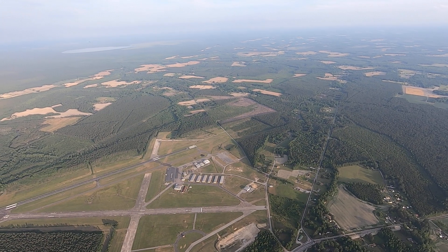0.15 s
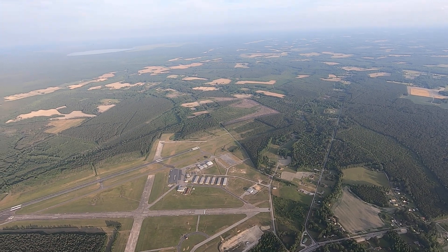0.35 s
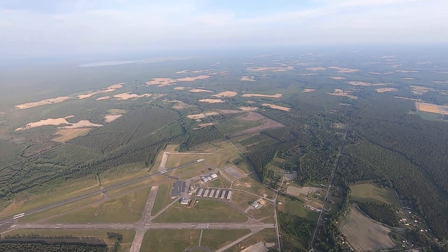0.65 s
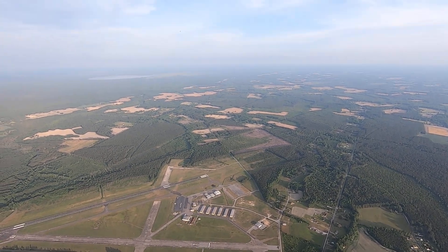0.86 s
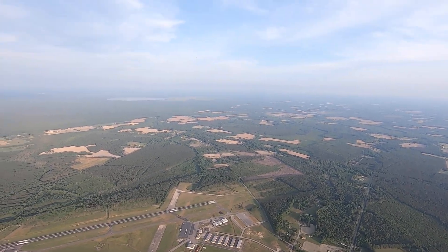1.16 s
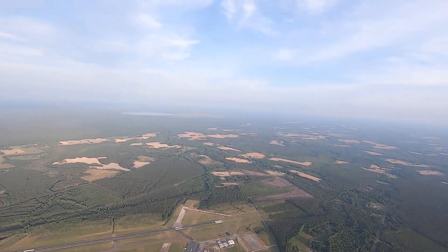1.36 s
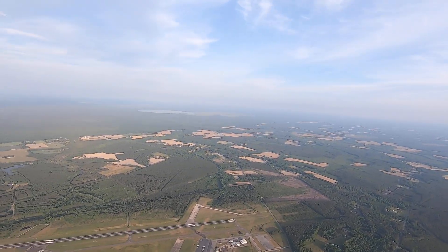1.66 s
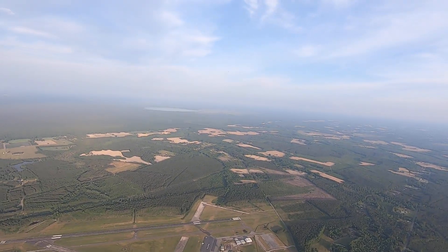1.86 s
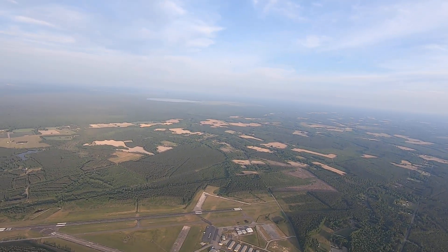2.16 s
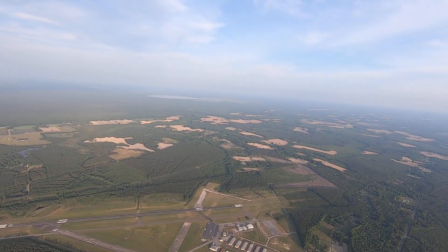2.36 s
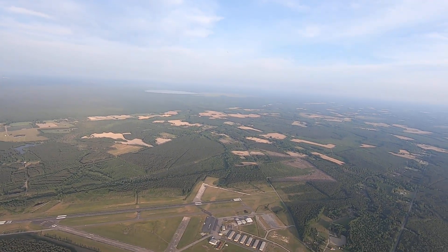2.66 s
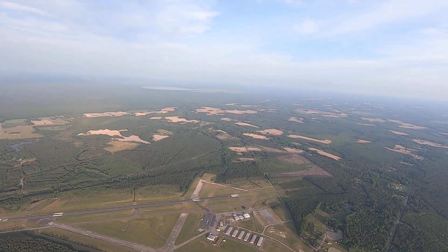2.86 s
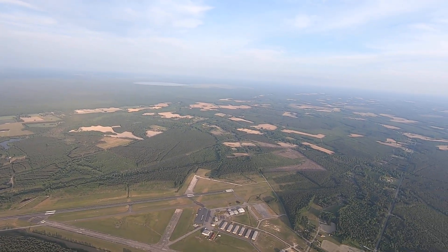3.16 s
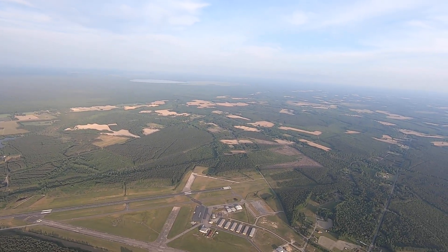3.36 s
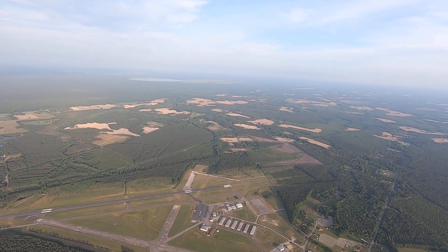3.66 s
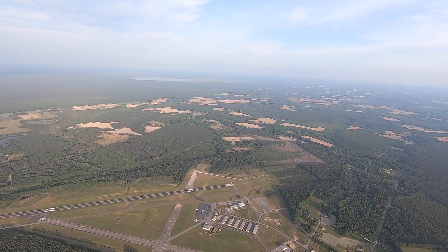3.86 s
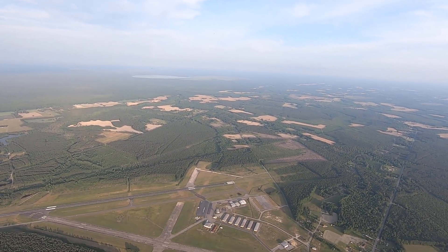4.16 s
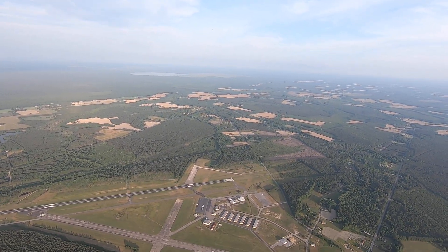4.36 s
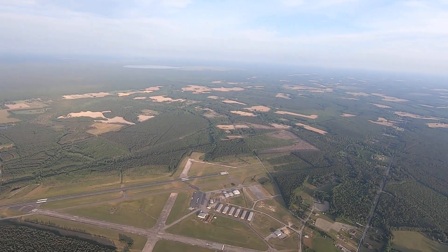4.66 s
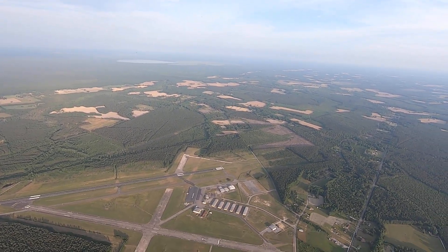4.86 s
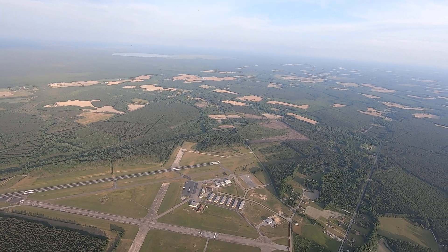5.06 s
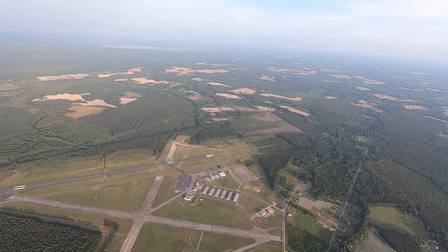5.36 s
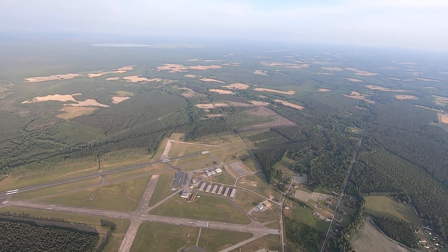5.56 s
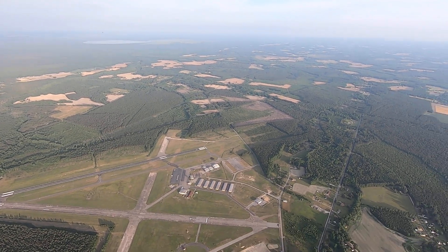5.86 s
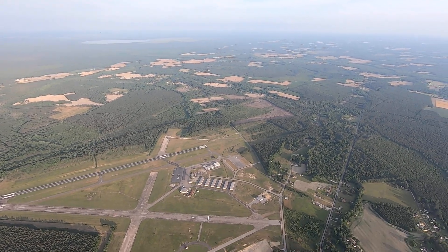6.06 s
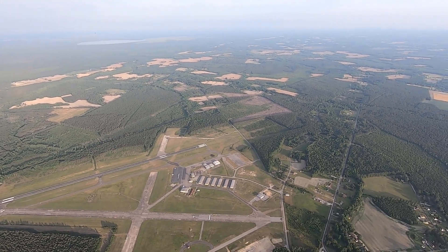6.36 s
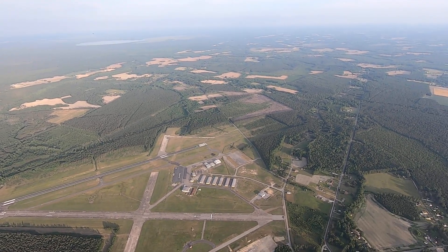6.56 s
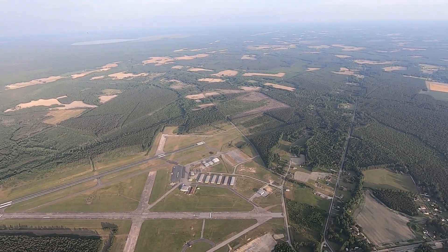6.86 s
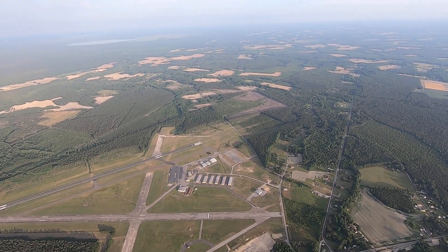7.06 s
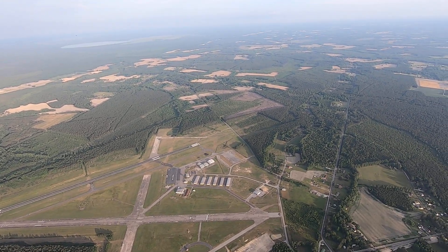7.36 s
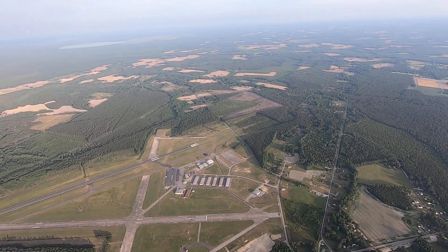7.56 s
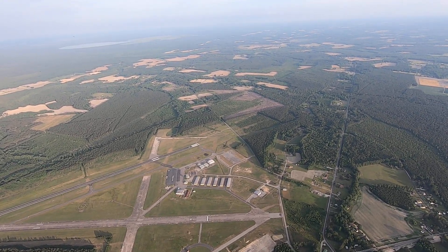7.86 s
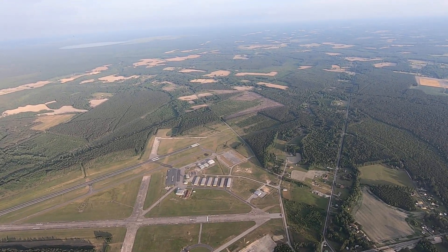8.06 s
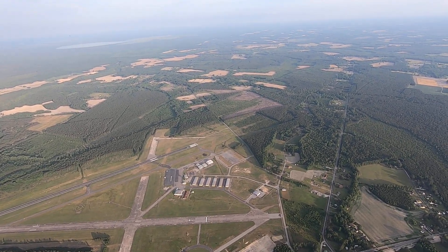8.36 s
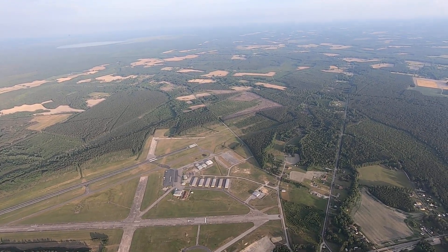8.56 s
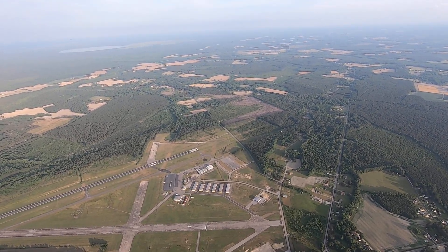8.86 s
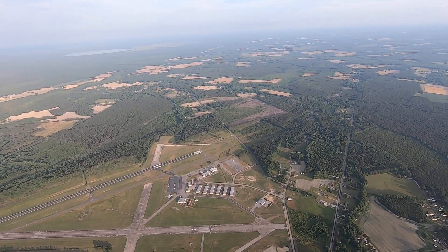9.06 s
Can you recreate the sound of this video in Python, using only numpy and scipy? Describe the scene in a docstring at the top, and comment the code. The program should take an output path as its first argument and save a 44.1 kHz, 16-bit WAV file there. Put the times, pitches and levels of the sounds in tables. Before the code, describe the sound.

A fast airstream batters a microphone high above the ground, low and gusty, with cloth flapping, faint ticks and a rougher, louder finish.

```python
"""Airstream on a camera microphone

A fast airstream tears past a camera microphone high in the open air: seven bands of shaped noise,
one per eddy size from thrum to sizzle, with level curves, shared gusts and brief rises and dips.
Big vortices once lock into a wavering near sine. Loose fabric flaps (filtered snap and noise puff);
something small ticks (gated bright noise). Gain control squeezes and rounds the peaks.
"""
import sys
import numpy as np
from scipy import signal
from scipy.fft import rfft, irfft, next_fast_len
from scipy.io import wavfile
from scipy.ndimage import uniform_filter1d

SR = 44100
rng = np.random.default_rng(int(sys.argv[2]) if len(sys.argv) > 2 else 0)


def put_to_file(sound):
    """Save the sound as 16-bit audio at rate SR, in the file named by the first command-line argument."""
    columns = np.atleast_2d(sound).T  # one column per channel
    safe = np.clip(columns, -1, 1)
    whole_steps = np.round(safe * 32767)
    wavfile.write(sys.argv[1], SR, whole_steps.astype(np.int16))


N = 406602

# Source levels are those ahead of the recorder.
# Bright ticks: start_s, gate_peak_db
TICKS = [(0.5474, -49), (0.5875, -38), (0.652, -40), (1.802, -46), (2.213, -42), (2.39, -42), (2.4723, -42),
         (3.8236, -48), (5.3294, -47), (6.2092, -43), (6.735, -46), (8.6453, -36), (8.765, -35),
         (8.91, -39), (9.046, -37)]
# Tick noise spectrum: frequency_hz, relative_density_db
TICK_SPECTRUM = [(1500, -12), (3500, 11), (6000, -2), (8000, -5), (10000, -15), (14000, -38)]
# Fabric flaps: start_s, thud_peak_db, crack_re_thud_db
FLAPS = [(0.145, -18, -18), (0.256, -20, -16), (0.546, -28, 10), (0.587, -32, 13), (0.782, -19, -20),
         (0.836, -16.5, -22), (1.205, -21, -24), (1.447, -18, -26), (1.48, -24, -12), (1.659, -23, -35),
         (1.701, -16, -15), (1.771, -14.5, -22), (1.793, -19, -22), (1.8025, -13.5, -10), (1.811, -22, -28),
         (2.835, -22, -25), (3.829, -28, -25), (3.902, -17, -24), (4.126, -17, -27), (4.268, -24, -30),
         (4.42, -17.5, -18), (5.041, -24, -1), (5.081, -16, -4), (5.227, -23, 6), (5.296, -20, -10),
         (5.333, -31, 2), (5.996, -17, -20), (8.316, -16, -20), (8.434, -17, -13), (8.519, -30, 3),
         (8.581, -24, 11), (8.634, -13, -13), (8.669, -15, -20), (8.692, -12, -13), (8.716, -15, -18),
         (8.762, -13, -13), (8.769, -14, -17), (8.781, -11, -18), (8.831, -15.5, -18), (8.912, -18, -13),
         (8.972, -21, -22), (9.047, -15, -8), (9.125, -21, 4)]
# Turbulence spectrum through the housing: frequency_hz, relative_density_db
TURBULENCE = [(12, -22), (30, -9), (56, -1), (80, -3), (115, -4), (200, -7), (500, -22), (1000, -28.5),
              (1750, -32.5), (2050, -35), (3600, -40.5), (4300, -47), (5400, -53.5), (6300, -59.5),
              (8300, -65), (10500, -73), (14500, -92.5)]
# Limits between the seven eddy sizes: frequency_hz
EDDY_EDGES_HZ = [67, 130, 260, 530, 1500, 4300]
# Levelling of each eddy size, thrum to sizzle: share_0_to_1
EVENNESS = [0.2, 0.22, 0.13, 0.19, 0.13, .06, .08]
# Gust depth per unit swing: frequency_hz, all_bands_db, neighbours_db, own_band_db
GUST_DEPTHS = [(60, 1.3, -0.5, 1), (238, 2.14, 1.1, 0.74), (600, 1.5, 1.9, 0.6), (1200, 2.33, 0, 0.2),
               (2200, 2.4, -0.7, 1), (4000, 0.85, 0.4, 0.3), (12000, -0.5, 0.7, .5)]
# Deep bass level: time_s, thrum_db, rumble_db
BASS = [(0.0, -25, -32), (0.2, -29, -16.5), (0.34, -21.5, -27.5), (0.7, -28, -19), (0.84, -22, -21.5),
        (1.1, -27, -21.5), (1.5, -23, -21.5), (1.58, -17, -28.5), (1.72, -16, -22.5), (1.89, -33, -22),
        (1.94, -14, -22), (2.16, -23, -21), (2.86, -22.5, -23.5), (2.98, -33, -20), (3.18, -23, -22.5),
        (3.42, -22.5, -26), (4.06, -19.5, -18.5), (4.94, -27.5, -26.5), (5.12, -21.5, -20.5),
        (5.22, -27, -22), (5.36, -18.5, -19.5), (5.52, -24, -23.5), (5.72, -19.5, -24.5),
        (6.12, -24, -18.5), (6.56, -20.5, -22), (7.3, -25, -19), (7.64, -18.5, -21.5), (8.46, -24.5, -20.5),
        (8.58, -17, -19), (8.7, -25.5, -18.5), (8.98, -16.5, -23.5), (9.12, -19, -20.5), (9.2, -25, -18)]
# Upper bass level: time_s, growl_db
GROWL = [(0.0, -28), (0.38, -30), (0.44, -21.5), (0.51, -31.5), (0.72, -21), (0.82, -30), (0.84, -26),
         (2.23, -32.5), (2.72, -28.5), (2.85, -21), (2.87, -30.5), (3.16, -27), (3.39, -31), (3.72, -27.5),
         (3.75, -39), (3.85, -25.5), (4.78, -28.5), (5.39, -25.5), (5.44, -26.5), (6.62, -26), (6.7, -19.5),
         (6.88, -32), (6.91, -23), (7.14, -32.5), (7.21, -28), (8.45, -23.5), (8.86, -19.5), (9.07, -26.5),
         (9.17, -16), (9.22, -28.5)]
# Buffeting wake, low roar; only its swing about the mean is used: time_s, level_db
WAKE = [(0.0, -29.5), (1.24, -25.5), (1.46, -31.5), (1.56, -30.5), (1.8, -27.5), (1.92, -29.5), (2.34, -35),
        (2.82, -29), (2.94, -32), (3.18, -30.5), (3.72, -31.5), (3.92, -27.5), (4.06, -27), (4.84, -32.5),
        (5.22, -27.5), (5.9, -25.5), (6.7, -25), (7.04, -27.5), (7.64, -26), (8.48, -25), (8.7, -19.5),
        (8.96, -26.5), (9.06, -25), (9.2, -27.5)]
# Smooth flow past the port, hiss; only its swing about the mean is used: time_s, level_db
FLOW = [(0.0, -38.5), (0.58, -38.5), (1.18, -42), (1.4, -43), (1.68, -48), (3.22, -40.5), (3.4, -44),
        (3.62, -39.5), (4.5, -40.5), (4.82, -41.5), (5.3, -35.5), (5.44, -38.5), (5.7, -37), (6.16, -39.5),
        (6.68, -38), (6.86, -40.5), (7.3, -39.0), (8.4, -37), (8.6, -34.5), (9.2, -35)]
# Brief rises (+) and dips (-) in level: centre_s, roar_change_db, hiss_change_db,
# length_s (full width at 1/e)
LEVEL_CHANGES = [(0.15, 1, 0, 0.026), (0.262, 14, 1.7, 0.011), (0.541, -2, 7, 0.01), (0.586, 6, 3, 0.011),
                 (1.387, 6, 5, 0.033), (1.453, 11, 1.5, 0.043), (1.698, 10, 5, 0.013),
                 (1.811, 5.5, 0, 0.015), (2.18, 8.5, -2, 0.032), (2.544, 7, 1.2, 0.021),
                 (2.834, 9, -3, 0.021), (3.622, 0, 1, 0.018), (3.938, 12, -3, 0.0083),
                 (4.056, -2, 2, 0.024), (4.118, 4, -1, 0.019), (4.286, 11.5, 3, 0.017),
                 (4.495, 3, 3.2, 0.071), (4.686, 5, 7, 0.017), (4.994, 1, 6, 0.018), (5.21, 8, -1, 0.048),
                 (5.286, 2, 9, 0.015), (5.337, 3.5, 11, 0.012), (5.697, -1, 1, 0.016),
                 (5.877, -6, 4, 0.015), (6.51, 6, -2, 0.019), (6.835, 11.5, 1, 0.017),
                 (7.267, 2.6, 10, 0.013), (7.311, -3, 4, 0.03), (7.649, 10, -1, 0.018),
                 (8.143, 1.5, 2, 0.05), (8.528, -4, 9, 0.014), (8.592, 1.5, 3.3, 0.023),
                 (8.77, 6, 4, 0.016), (8.963, 9, -4, 0.033)]
# Buffet, rush, hiss, sizzle: base_level_db, flow_share, wake_share, roar_share, hiss_share
SMALL_EDDIES = [(-32, 0.076, 0.98, 0.83, 0.02), (-36, 0.46, 0.4, 0.21, 0.56), (-40.5, 0.8, .05, 0.02, 0.59),
                (-53.5, 0.73, 0.054, 0.02, 0.27)]

TICK_BURST_S, FLAP_BURST_S = 0.002, 0.0029  # twice the rise time
SNAP_DB = 31  # re unit-spread puff noise
LOCK_START_S, LOCK_ATTACK_S, LOCK_HOLD_S, LOCK_RELEASE_S = 1.575, 0.04, 0.29, 0.044
LOCK_HZ, LOCK_WAVER_HZ = 57.3, 2.5
LOCK_RMS_DB, LOCK_WAVER_DB = -16, 1
LOCK_OCTAVE_DB = -18  # second harmonic re fundamental
THRUM_YIELD_DB = 7  # cut in random thrum at full lock
GROWL_ROAR_SHARE = 0.68
ROUNDING_LEVEL = 0.69  # tanh ceiling of the microphone amplifier
STOPBAND_HZ = 15300


def from_db(db):
    """Decibels to amplitude gain."""
    return 10 ** (np.asarray(db) / 20)


def rms_one(x):
    """Scale to unit rms."""
    return x / np.sqrt(np.mean(x ** 2) + 1e-20)


def at_hz(points, hz):
    """Table columns interpolated on a log-frequency axis."""
    centre_hz, *columns = np.transpose(points)
    return np.squeeze([np.interp(np.log(hz), np.log(centre_hz), c) for c in columns])


def in_time(rows):
    """Table columns interpolated linearly in time."""
    time_s, *columns = np.transpose(rows)
    return [np.interp(np.arange(N) / SR, time_s, c) for c in columns]


def drift(rate_hz):
    """Slow chance: noise at every 40th sample, two one-pole low-passes, unit spread."""
    step = 40
    pole = np.exp(-2 * np.pi * rate_hz * step / SR)
    noise = rng.standard_normal(N // step + 2002)
    slow = signal.lfilter([1], [1, -2 * pole, pole * pole], noise)[2000:]  # drop the settling
    return np.interp(np.arange(N) / step, np.arange(len(slow)), rms_one(slow))


def gust(rate_hz, longest_s=0.16, skew=0.31):
    """Quick chance swings, slow ones removed; swells stick out further than lulls."""
    swing = drift(rate_hz)
    swing = rms_one(swing - uniform_filter1d(swing, int(longest_s * SR)))
    return swing + skew * (swing ** 2 - 1)


def coloured_noise(spectrum):
    """Frequency axis and complex spectrum of noise shaped by a table."""
    size = next_fast_len(N)
    hz = np.maximum(np.arange(size // 2 + 1) * SR / size, 1)
    white = rfft(rng.standard_normal(size))
    return hz, white * from_db(at_hz(spectrum, hz))


def burst(length_s):
    """Envelope t*exp(1-t): quick rise over half the length, slower fall, top 1."""
    t = 2 * np.arange(int(8 * length_s * SR) + 2) / SR / length_s
    return t * np.exp(1 - t)


def ticks():
    """Bright noise let through for a few milliseconds per tick."""
    gate = np.zeros(N + SR)
    shape = burst(TICK_BURST_S)
    for start_s, peak_db in TICKS:
        first = int(start_s * SR)
        gate[first:first + len(shape)] += from_db(peak_db) * shape
    _, spectrum = coloured_noise(TICK_SPECTRUM)
    return gate[:N] * rms_one(irfft(spectrum)[:N])


def flaps():
    """Cloth pulls taut: a snap and a short noise puff, filtered into dull thud and sharper crack."""
    out = np.zeros(N + SR)
    puffs = rng.standard_normal((len(FLAPS), 8000))
    thud_band = signal.butter(2, [260, 755], "band", fs=SR, output="sos")
    crack_band = signal.butter(2, [1000, 2900], "band", fs=SR, output="sos")
    soft = signal.butter(5, 3840, fs=SR, output="sos")  # cloth gives little treble
    shape = burst(FLAP_BURST_S)
    for (start_s, thud_db, crack_db), puff in zip(FLAPS, puffs):
        puff = puff * np.pad(shape, (0, len(puff) - len(shape)))
        snap_sign = np.sign(puff[1])
        puff[np.argmax(shape) // 2] += from_db(SNAP_DB) * snap_sign
        thud, crack = (signal.sosfilt(np.vstack([band, soft]), puff) for band in (thud_band, crack_band))
        thud = thud / np.abs(thud).max()
        crack = crack / np.abs(crack).max()
        first = int(start_s * SR)
        out[first:first + len(puff)] += from_db(thud_db) * (thud + from_db(crack_db) * crack)
    return out[:N]


def lock():
    """Degree to which the shedding has locked, 0 to 1: attack, hold, release."""
    corners_s = LOCK_START_S + np.cumsum([0, LOCK_ATTACK_S, LOCK_HOLD_S, LOCK_RELEASE_S])
    return np.interp(np.arange(N) / SR, corners_s, [0, 1, 1, 0])


def locked_shedding():
    """Regular vortices: a near sine wavering in pitch and level, crests sharpened by its octave."""
    pitch_hz = LOCK_HZ + LOCK_WAVER_HZ * drift(5.8)
    phase = 2 * np.pi * (np.cumsum(pitch_hz) / SR + rng.random())
    tone = np.sin(phase) - from_db(LOCK_OCTAVE_DB) * np.cos(2 * phase)
    level_db = LOCK_RMS_DB + LOCK_WAVER_DB * drift(3.2)
    return np.sqrt(2) * lock() * from_db(level_db) * tone


def level_changes():
    """Brief rises and dips in roar and hiss level: Gaussian bells, in dB."""
    t = np.arange(0, N / SR, 0.001)
    centre_s, roar_db, hiss_db, length_s = np.transpose(LEVEL_CHANGES)
    bells = np.exp(-(2 * (t[:, None] - centre_s) / length_s) ** 2)
    return in_time(np.c_[t, bells @ roar_db, bells @ hiss_db])


def eddy_levels():
    """Level of each size in dB; the smaller follow flow, wake and brief changes by their own shares."""
    (flow,), (wake,), (growl,) = in_time(FLOW), in_time(WAKE), in_time(GROWL)
    thrum, rumble = in_time(BASS)
    roar, hiss = level_changes()
    flow_swing = flow - flow.mean()
    wake_swing = wake - wake.mean()
    levels = [thrum - THRUM_YIELD_DB * lock(), rumble, growl + GROWL_ROAR_SHARE * roar]
    for base_db, flow_share, wake_share, roar_share, hiss_share in SMALL_EDDIES:
        steady = base_db + flow_share * flow_swing + wake_share * wake_swing
        levels.append(steady + roar_share * roar + hiss_share * hiss)
    return levels


def even_out(x, share, span_s=0.011):
    """Divide out part of the noise's own quick level fluctuation."""
    span = int(span_s * SR)
    power = uniform_filter1d(uniform_filter1d(x ** 2, span), span)
    return x / (power + 0.022 * np.mean(x ** 2)) ** (np.clip(share, 0, 1) / 2)


def airstream():
    """Turbulence in half-octave bands flickering with gusts, summed by eddy size and levelled."""
    hz, noise = coloured_noise(TURBULENCE)
    centres_hz = 14 * 2 ** np.arange(0, 10.5, 0.5)
    place = np.interp(np.log(hz), np.log(centres_hz), np.arange(len(centres_hz)))
    shared = 0.26 * gust(25) + 0.54 * gust(65)
    near = [gust(34) for _ in range(len(centres_hz) // 2 + 2)]
    sizes = np.zeros((len(EDDY_EDGES_HZ) + 1, N))
    for k, centre_hz in enumerate(centres_hz):
        window = np.cos(np.pi / 2 * np.clip(place - k, -1, 1)) ** 2  # overlapping bands sum to one
        band = irfft(noise * window)[:N]
        shared_db, near_db, own_db = at_hz(GUST_DEPTHS, centre_hz)
        neighbours = (near[k // 2] + near[(k + 1) // 2]) / 2
        gain = from_db(shared_db * shared + near_db * neighbours + own_db * gust(25))
        sizes[np.searchsorted(EDDY_EDGES_HZ, centre_hz)] += band * rms_one(gain)
    evened = [even_out(x, share) for x, share in zip(sizes, EVENNESS)]
    return sum(rms_one(x) * from_db(db) for x, db in zip(evened, eddy_levels()))


def scene():
    """All sources summed at the one microphone."""
    return (airstream() + locked_shedding() + flaps() + ticks())[None]


def record(dry):
    """Gain control leans on loud moments, tanh rounds the peaks, a steep low-pass cuts the top."""
    smooth = np.exp(-1 / (0.027 * SR))  # 27 ms power average
    power = signal.lfilter([1 - smooth], [1, -smooth], dry ** 2, zi=[[0.015]])[0]
    over_db = 10 * np.log10(power + 1e-9) + 12  # threshold -12 dB
    squeezed = dry * from_db(-0.25 * np.maximum(over_db, 0))
    rounded = ROUNDING_LEVEL * np.tanh(squeezed / ROUNDING_LEVEL)
    low_pass = signal.cheby2(12, 60, STOPBAND_HZ, fs=SR, output="sos")
    return signal.sosfilt(low_pass, rounded)


dry = scene()
out = record(dry)
put_to_file(out)
```